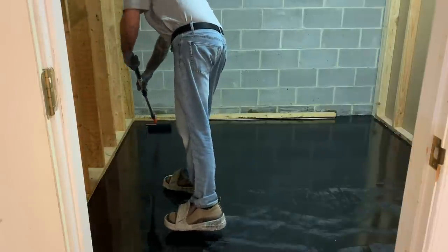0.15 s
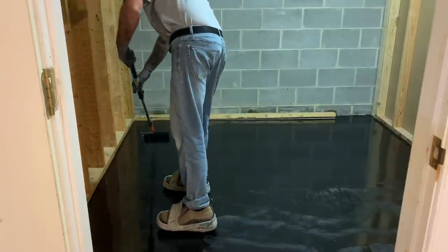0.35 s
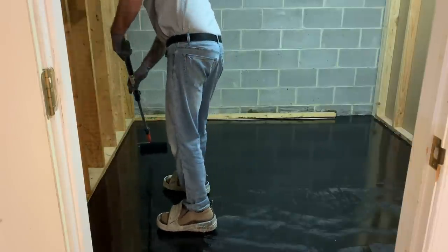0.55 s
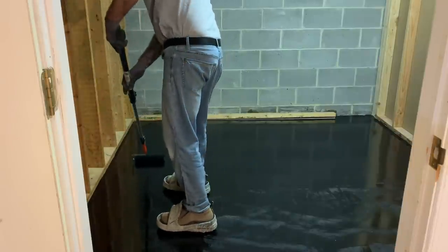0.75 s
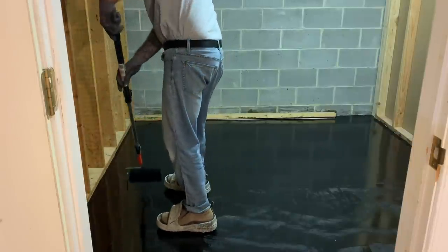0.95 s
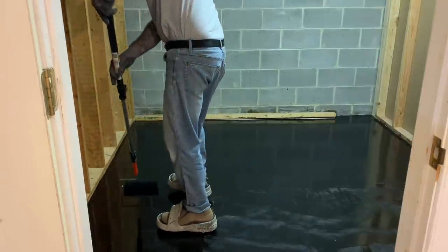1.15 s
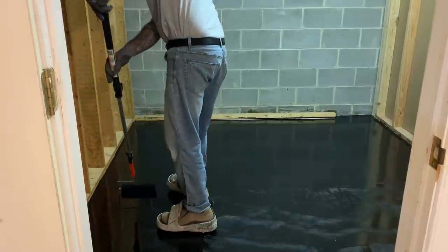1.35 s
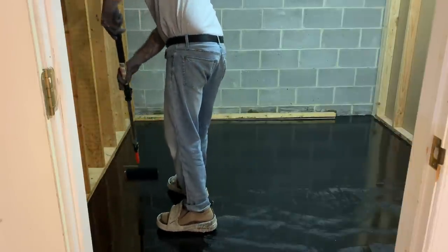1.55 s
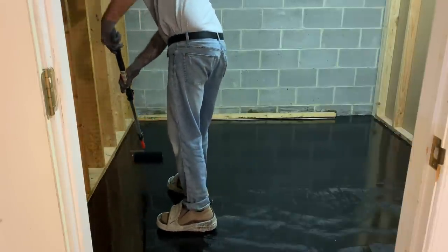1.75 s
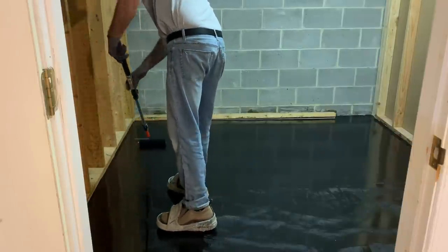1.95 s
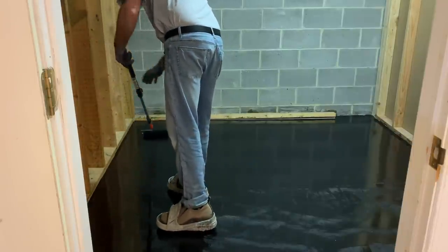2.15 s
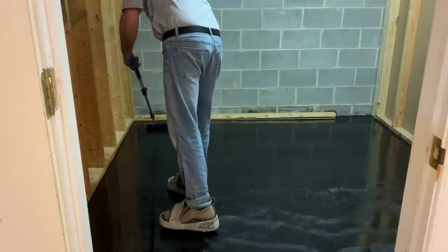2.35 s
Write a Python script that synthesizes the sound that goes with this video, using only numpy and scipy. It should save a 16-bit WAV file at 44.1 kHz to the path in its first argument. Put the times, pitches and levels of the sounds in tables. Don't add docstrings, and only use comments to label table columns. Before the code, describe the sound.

Sticky wet-paint crackle from a roller on a concrete floor, two strokes separated by near silence, loose frame clatter at each turn, light axle squeaks in the second; short hard-walled room echo, thin low end.

```python
import sys
import numpy as np
from scipy import signal
from scipy.fft import rfft, irfft
from scipy.io import wavfile
from scipy.ndimage import uniform_filter1d

SR = 44100
rng = np.random.default_rng(int(sys.argv[2]) if len(sys.argv) > 2 else 0)


def wav_record(signal):
    frames = np.transpose(np.atleast_2d(signal))
    bounded = np.clip(frames, -1, 1)
    quanta = np.round(bounded * 32767).astype(np.int16)
    wavfile.write(sys.argv[1], SR, quanta)


def amplitude_ratio(level_db):
    exponent = np.asarray(level_db, float) / 20
    return 10 ** exponent


N = 105840

# time in seconds, level in dB, lift of the low edge in dB.
PEELING = [(0, -93, 5), (.078, -82, 7), (.086, -70, -7), (.125, -57, -9), (.228, -52, -8.5),
           (.25, -50, -1.5), (.41, -49, 4), (.91, -51, -0.5), (.95, -64, 5), (1.325, -71, 8.5),
           (1.375, -87.5, 7), (1.40, -73, 7), (1.505, -73.5, -11), (1.54, -53.5, -1.5), (1.70, -47, 1),
           (1.95, -51, -1.5), (2.14, -53.5, -10.5), (2.26, -74.5, -6), (2.28, -70.5, 4.5)]
# frequency in Hz, level in dB.
SIZZLE_COLOUR = [(1900, -50), (2500, -16.5), (3100, -9.5), (4100, -10.5), (5000, -6.5), (7900, -3.5),
                 (12300, 0.5), (13900, -1.5), (14600, -20.5)]
SNAPS_PER_S, SNAP_SPREAD_DB, SNAP_CYCLES = 9000, 2, 5.7
SIZZLE_WET = 0.6
LOW_EDGE_HZ = 4800
FLICKER_DB, FLICKER_S, SIZZLE_PATCH_DB = 0.96, 0.027, 2

# start in seconds, level in dB, low edge in Hz.
THREAD_TEARS = [(.063, -71, 6500), (.0832, -53, 7300), (0.092, -60, 7060), (.101, -52, 7000),
                (0.106, -54, 7500), (.115, -59, 7560), (.138, -52.5, 3400), (0.151, -62, 8000),
                (0.196, -55, 4530), (.206, -53.5, 4500), (.233, -51, 8400), (0.238, -42, 5060)]
TEAR_S = 0.0012

# start in seconds, level in dB, pitch in Hz.
FRAME_TAPS = [(.4849, -27, 1090), (0.4848, -29, 2030), (0.485, -44.5, 394), (0.487, -30, 2800),
              (0.4915, -49, 930), (.491, -37, 2130), (.496, -36, 870), (.4995, -51.5, 1010),
              (.5105, -43, 2100), (.5147, -24, 1050), (0.5154, -36.5, 1530), (0.514, -39.5, 276),
              (.5195, -53, 850), (0.524, -37, 1280), (0.526, -32.5, 1460), (0.532, -41, 2600),
              (0.5316, -41, 1240), (0.5375, -50, 1150), (0.543, -32.5, 1300), (.546, -33.5, 1600),
              (.545, -43.5, 335), (.551, -38.5, 1210), (.558, -43, 1260), (0.583, -51, 1150),
              (.586, -46, 1370), (.595, -44.5, 1250), (0.618, -50, 1060), (0.632, -50, 1300),
              (1.393, -64, 486), (1.4004, -49.5, 498), (1.406, -63, 890), (1.4085, -52, 550),
              (1.419, -47.5, 380), (1.424, -49, 670), (1.428, -45, 930), (1.431, -42, 664),
              (1.431, -51.5, 260), (1.4369, -28, 2230), (1.439, -42, 1140), (1.4415, -38, 2250),
              (1.4476, -46, 2600), (1.441, -38.5, 566), (1.4434, -27.5, 1005), (1.4508, -42, 960),
              (1.4512, -46, 2150), (1.4543, -37, 1140), (1.459, -38, 1240), (1.462, -49, 276),
              (1.466, -40, 2440), (1.4715, -51, 1300), (1.478, -51, 1590), (1.485, -37, 1000),
              (1.488, -37, 1190), (1.4933, -36, 1050), (1.499, -39, 1080), (1.5033, -41, 1150),
              (1.5068, -45, 1090), (1.5215, -46, 980)]
TAP_DAMPING = 0.36
# start in seconds, level in dB, hold in seconds,
# brightness (twice the tilt in dB per octave).
FRAME_RATTLES = [
    (0.4835, -42, 0.031, -5.5),
    (0.519, -43.5, 0.023, -5.5),
    (0.58, -67, 0.069, -15),
    (1.404, -59, 0.019, -23),
    (1.412, -59.5, 0.019, -6.5),
    (1.4372, -40, 0.024, -4),
    (1.468, -50, 0.034, 3),
    (1.517, -68, 0.089, 3),
]
# frequency in Hz, width in Hz, level in dB.
FRAME_MODES = [(270, 110, -19), (560, 200, -11), (820, 200, -4.5), (1030, 260, -.8), (1350, 280, -3),
               (1750, 300, -7), (2250, 450, -7), (2780, 400, -10)]
RATTLE_PER_S, RATTLE_T60_S, TREBLE_FADE_DB_PER_S = 6000, 0.08, 160
FRAME_TOP_HZ, KNOCK_WET_DB, ROOM_T60_S = 3190, -8, 0.3

# middle in seconds, length in seconds, tube level in dB, ring level in dB.
SLEEVE_RUBS = [
    (1.707, 0.12, -59, -55.5),
    (1.776, 0.07, -72, -57),
    (1.878, 0.12, -58.5, -58.5),
    (1.937, 0.059, -69.5, -58.5),
    (1.994, 0.063, -79, -59.5),
    (2.028, 0.1, -62, -61.5),
    (2.124, 0.24, -95, -71),
    (2.179, 0.079, -63, -62.5),
    (2.228, 0.078, -64, -63),
    (2.383, 0.051, -74.5, -77),
]
# frequency in Hz, width in Hz, level in dB.
TUBE_MODES = [(274, 150, -19.5), (520, 21, -22), (653, 38, -5), (753, 41, -3), (866, 57, -1),
              (952, 56, -1.5), (1667, 180, -4.5), (1885, 57, -4.5)]
# frequency in Hz, width in Hz, level in dB.
RING_MODES = [(2985, 76, 1.5), (2600, 350, -9), (3200, 530, -3), (3920, 59, -13.5), (4960, 200, -1.5),
              (5740, 400, -11), (6400, 270, -7.5), (7115, 300, 2.5)]
SLIPS_PER_S = 3100

# middle in seconds, length in seconds, pitch in Hz, spread in Hz.
GROAN_SLIPS = [(.05, .1, 400, 200), (.14, .05, 3300, 900), (.25, .3, 850, 150), (.33, .2, 1950, 130),
               (.42, .07, 1150, 400), (.64, .16, 420, 100), (.70, .14, 3050, 150), (.71, .08, 660, 110),
               (.78, .03, 770, 60), (.76, .15, 400, 80), (.82, .03, 1100, 80), (.83, .03, 3480, 120),
               (.855, .05, 880, 50), (.89, .08, 1400, 70), (.9, .17, 410, 110), (.97, .12, 2900, 350),
               (.99, .14, 1100, 100), (.99, .03, 2200, 300), (1.0, .17, 1450, 350), (1.12, .12, 1750, 80),
               (1.16, .05, 1430, 60), (1.165, .05, 405, 40), (1.2, .05, 405, 40), (1.437, .04, 4400, 600),
               (1.68, .06, 430, 50), (1.865, .05, 280, 140), (1.86, .22, 3010, 50), (2.13, .1, 3500, 200),
               (2.21, .12, 12800, 1000), (2.305, .05, 1800, 60), (1.99, .06, 4920, 70),
               (2.04, .06, 4930, 120), (2.13, .11, 5050, 200), (2.2, .07, 5010, 120),
               (2.25, .05, 4980, 120), (2.393, .04, 885, 60), (1.125, .06, 450, 150), (2.21, .03, 850, 120),
               (1.86, .03, 960, 90), (1.68, .04, 930, 90), (2.395, .03, 7000, 150)]
GROAN_LEVELS = [-85, -75.5, -86, -79, -77.5, -63.5, -70.5, -62, -65.5, -65.5, -69.5, -64.5, -64, -73, -70,
                -65.5, -69, -67, -67, -79, -79.5, -68.5, -70, -69, -70, -65, -66, -71, -59.5, -77, -59.5,
                -66, -69, -69.5, -71, -60, -75.5, -58.5, -57.5, -66.5, -75]

# frequency in Hz, level in dB.
ROLL_COLOUR = [(180, -28), (280, -6), (420, -5.5), (650, -5), (1400, -1.5), (2300, -5), (3300, -8),
               (4500, -37)]
# time in seconds, level in dB.
ROLL_PRESSURE = [(0, -87), (.3, -84.5), (.47, -74), (.56, -70), (.7, -61.5), (.9, -65.5), (1.1, -75.5),
                 (1.31, -80.5), (1.385, -88), (1.47, -60.5), (1.63, -66), (1.9, -60.5), (2.08, -73.5),
                 (2.27, -80), (2.4, -83.5)]

# frequency in Hz, level in dB.
AIR_COLOUR = [(100, -38.5), (200, 2.5), (450, -0.5), (900, -7), (2000, -23), (4000, -13), (14000, -19)]
AIR_DB = -88

BASS_CUT_HZ, BASS_LEAK_DB, TOP_HZ = 220, -41.5, 14620
LOW_BAND_HZ, LOW_BAND_DB = 123, -3.5


def evened(x):
    return x / np.sqrt(np.mean(x ** 2) + 1e-20)


def curve(points, column=1):
    rows = np.transpose(points)
    return np.interp(np.arange(N) / SR, rows[0], rows[column])


def coloured(x, points):
    f, db = np.transpose(points)
    hz = np.fft.rfftfreq(N, 1 / SR)
    gain_db = np.interp(np.log(hz + 1), np.log(f), db, left=-70, right=-70)
    return evened(irfft(rfft(x) * amplitude_ratio(gain_db), N))


def clicks(count, per_s, spread_db):
    chance, size, side = rng.random((count, 3)).T
    happens = chance < per_s / SR
    return happens * amplitude_ratio(-spread_db * np.log(np.maximum(size, .005))) * np.sign(side - .5)


def ring(x, hz, width):
    r = np.exp(-np.pi * width / SR)
    for _ in range(2):
        x = signal.lfilter([1 - r, 0, r - 1], [1, -2 * r * np.cos(2 * np.pi * hz / SR), r * r], x)
    return x


def body(x, modes, tilt_db=0):
    out = 0
    for k, (hz, width, db) in enumerate(modes):
        level = amplitude_ratio(db + tilt_db * np.log2(max(hz, 500) / 1000))
        out = out + (-1) ** k * level * ring(x, hz, width) / np.sqrt(width)
    return out


def swell(middle, length):
    return np.cos(np.pi * np.clip((np.arange(N) / SR - middle) / length, -.5, .5)) ** 2


def patchy(x, depth_db, size, extra_db=0):
    z = signal.stft(x, SR, nperseg=512)[2]
    patches = uniform_filter1d(rng.standard_normal(z.shape), size[0], 0)
    patches = evened(uniform_filter1d(patches, size[1], 1))
    return signal.istft(z * amplitude_ratio(depth_db * patches + extra_db), SR, nperseg=512)[1][:N]


def room(x):
    t = np.arange(SR // 2) / SR
    tail = rng.standard_normal(len(t)) * amplitude_ratio(-60 * t / ROOM_T60_S) * (t > .003)
    return signal.fftconvolve(x, tail / np.linalg.norm(tail))[:N]


def sizzle():
    snaps = np.zeros(N)
    for hz in np.geomspace(2500, 14500, num=24):
        t = np.arange(0, SNAP_CYCLES / hz, 1 / SR)
        grain = np.sin(2 * np.pi * hz * t) * np.hanning(len(t))
        grain = grain / np.linalg.norm(grain) * np.sqrt(hz)
        snaps += signal.oaconvolve(clicks(N, SNAPS_PER_S / 24, SNAP_SPREAD_DB), grain)[:N]
    blur = rng.standard_normal(N)
    mix = np.sqrt(1 - SIZZLE_WET) * evened(snaps) + np.sqrt(SIZZLE_WET) * blur
    span = int(FLICKER_S * SR)
    flicker = uniform_filter1d(rng.standard_normal(N), span)
    flicker = evened(uniform_filter1d(flicker, span))
    low_share = 1 / (1 + (np.fft.rfftfreq(512, 1 / SR) / LOW_EDGE_HZ) ** 4)
    moments = np.minimum(np.arange(N // 256 + 2) * 256, N - 1)
    edge_db = np.outer(low_share, curve(PEELING, column=2)[moments])
    fizz = patchy(coloured(mix, SIZZLE_COLOUR), SIZZLE_PATCH_DB, (4, 9), edge_db)
    return fizz * amplitude_ratio(curve(PEELING) + FLICKER_DB * flicker)


def tears():
    out, t = np.zeros(N), np.arange(400) / SR
    shape = t / TEAR_S * np.exp(1 - t / TEAR_S)
    for s, db, edge_hz in THREAD_TEARS:
        high_pass = signal.butter(4, edge_hz, "high", fs=SR, output="sos")
        bright = evened(signal.sosfilt(high_pass, rng.standard_normal(len(t))))
        out[round(s * SR):][:len(t)] += amplitude_ratio(db) * bright * shape
    return out


def knocks():
    out, t = np.zeros(N + SR), np.arange(SR // 4) / SR
    for s, db, hz in FRAME_TAPS:
        tap = ring((t == 0) * 1., hz, TAP_DAMPING * hz)
        out[round(s * SR):][:len(t)] += amplitude_ratio(db) * tap / abs(tap).max()
    low_pass = signal.butter(2, 1700, fs=SR, output="sos")
    for s, db, hold, tilt_db in FRAME_RATTLES:
        rattle = evened(body(clicks(len(t), RATTLE_PER_S, 3.3), FRAME_MODES, .5 * tilt_db))
        dull = signal.sosfiltfilt(low_pass, rattle)
        rattle = dull + (rattle - dull) * amplitude_ratio(3.5 - TREBLE_FADE_DB_PER_S * t)
        shape = np.minimum(t / 0.001, 1) * amplitude_ratio(-60 * np.maximum(t - hold, 0) / RATTLE_T60_S)
        out[round(s * SR):][:len(t)] += amplitude_ratio(db) * shape * rattle
    out = signal.sosfilt(signal.butter(8, FRAME_TOP_HZ, fs=SR, output="sos"), out[:N])
    return out + amplitude_ratio(KNOCK_WET_DB) * room(out)


def sleeve():
    low = patchy(body(clicks(N, SLIPS_PER_S, 2.2), TUBE_MODES), 2.7, size=(5, 6))
    high = patchy(body(clicks(N, SLIPS_PER_S, 2.2), RING_MODES), 2.7, size=(5, 6))
    out = np.zeros(N)
    for s, length, tube_db, ring_db in SLEEVE_RUBS:
        shape = swell(s, 1.18 * length)
        rub = amplitude_ratio(tube_db) * evened(shape * low) + amplitude_ratio(ring_db) * evened(shape * high)
        out += np.sqrt(np.mean(shape ** 2)) * rub
    return out


def groans():
    slips, out = clicks(N, SLIPS_PER_S, 0.48), np.zeros(N)
    for (s, length, hz, width), db in zip(GROAN_SLIPS, GROAN_LEVELS):
        shape = swell(s, 1.49 * length)
        groan = evened(shape * ring(slips, hz, width))
        out += amplitude_ratio(db) * np.sqrt(np.mean(shape ** 2)) * groan
    return out


def rolling():
    rumble = patchy(coloured(rng.standard_normal(N), ROLL_COLOUR), 6.0, size=(2, 8))
    return evened(rumble) * amplitude_ratio(curve(ROLL_PRESSURE))


def air():
    return amplitude_ratio(AIR_DB) * patchy(coloured(rng.standard_normal(N), AIR_COLOUR), 5.1, size=(2, 8))


def scene():
    paint = sizzle() + tears()
    roller = knocks() + sleeve() + groans()
    return (paint + roller + rolling() + air())[None]


def roll_off(x):
    return signal.sosfilt(signal.butter(12, 15590, fs=SR, output="sos"), x)


def record(dry):
    high_pass = signal.butter(8, BASS_CUT_HZ, "high", fs=SR, output="sos")
    mix = signal.sosfilt(high_pass, dry)
    mix = mix + amplitude_ratio(BASS_LEAK_DB) * dry + amplitude_ratio(LOW_BAND_DB) * ring(dry, LOW_BAND_HZ, 30)
    treble_limit = signal.firwin(255, TOP_HZ, window=("kaiser", 8), fs=SR)
    mix = signal.oaconvolve(mix, treble_limit[None], "same")
    return roll_off(mix)


dry = scene()
out = record(dry)
wav_record(out)
```